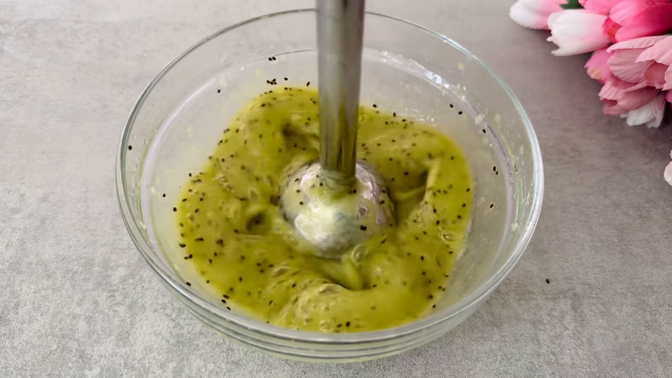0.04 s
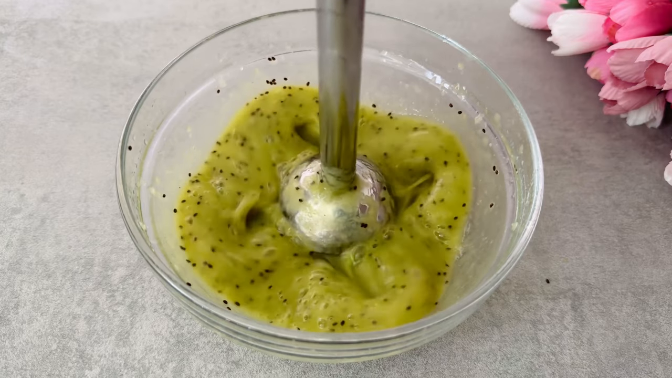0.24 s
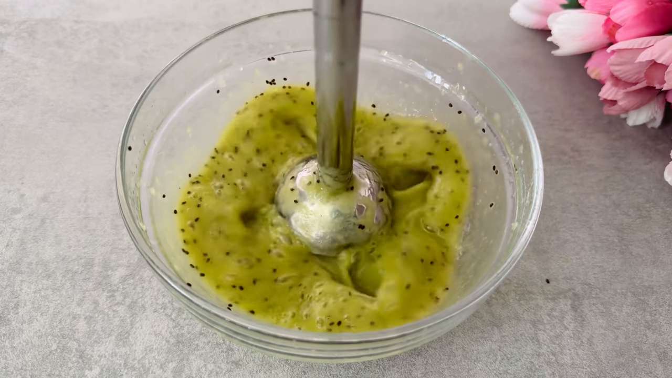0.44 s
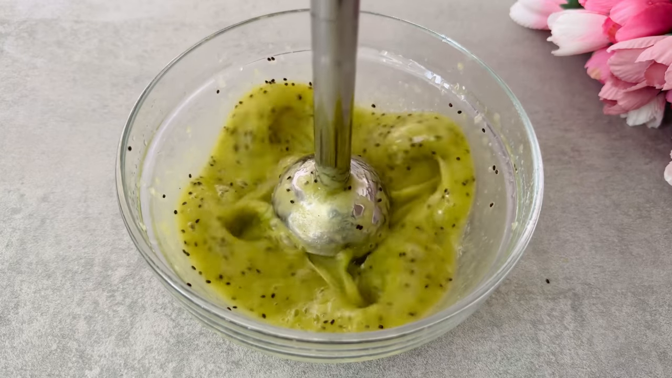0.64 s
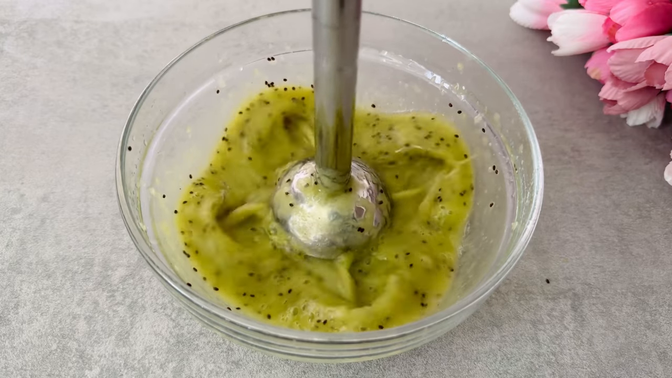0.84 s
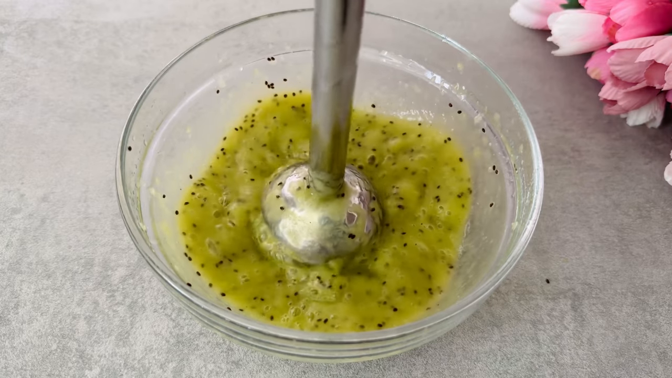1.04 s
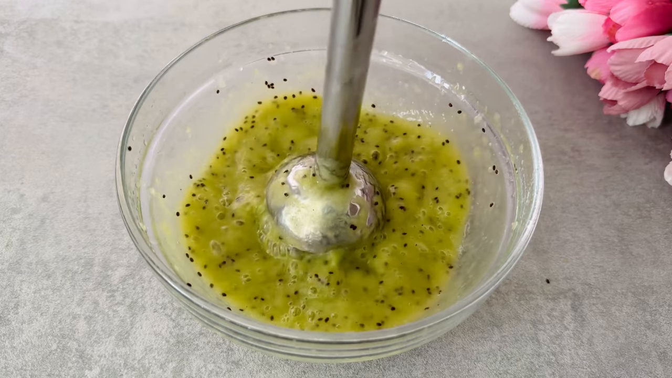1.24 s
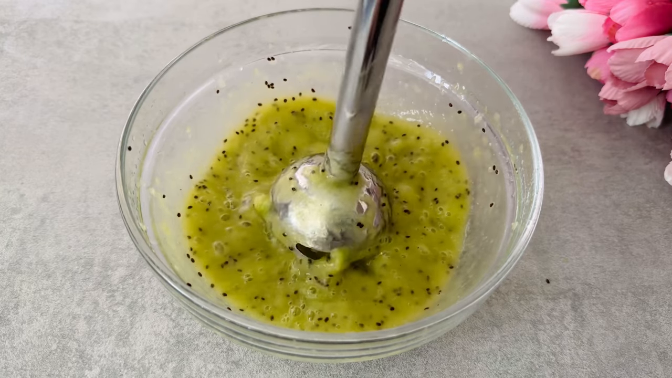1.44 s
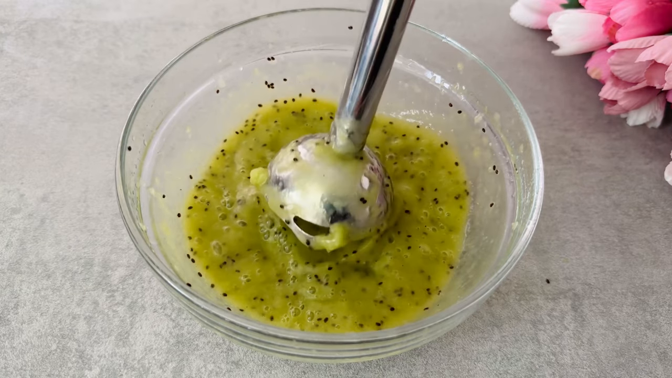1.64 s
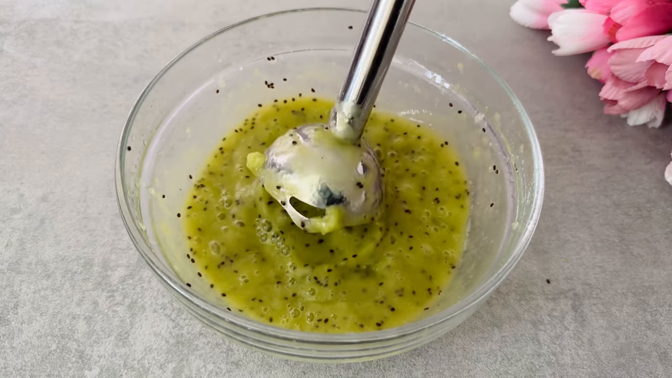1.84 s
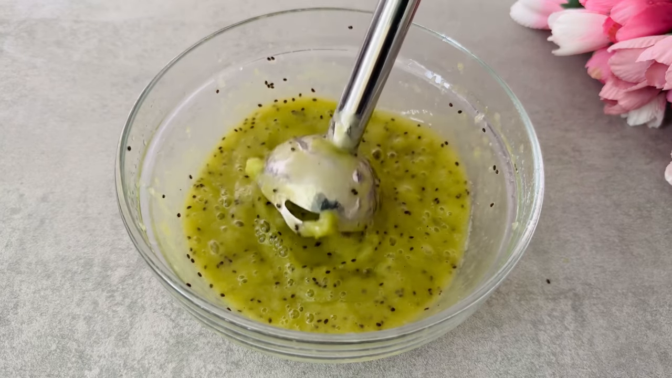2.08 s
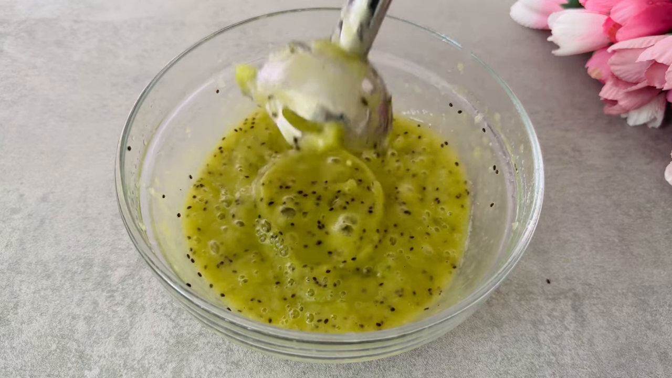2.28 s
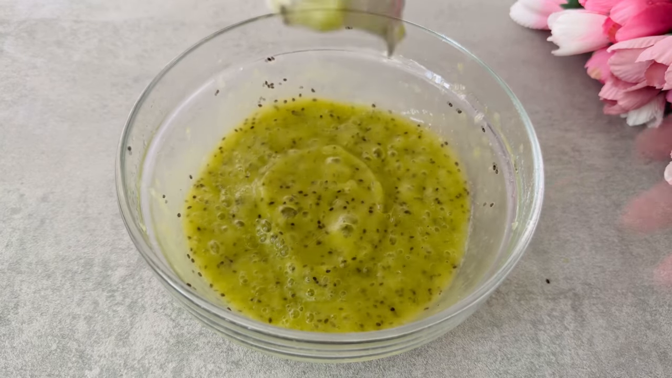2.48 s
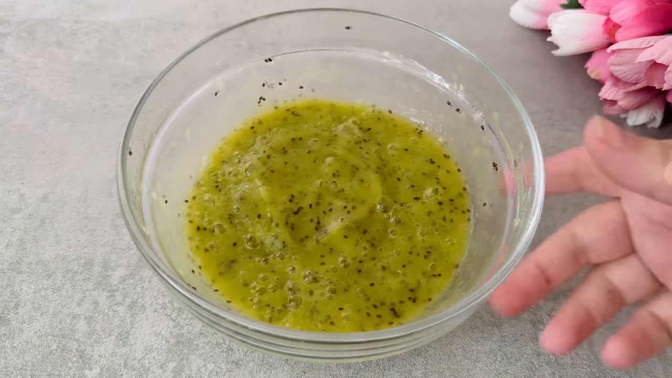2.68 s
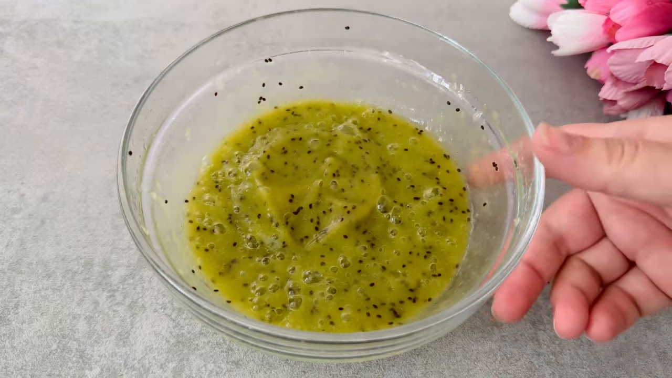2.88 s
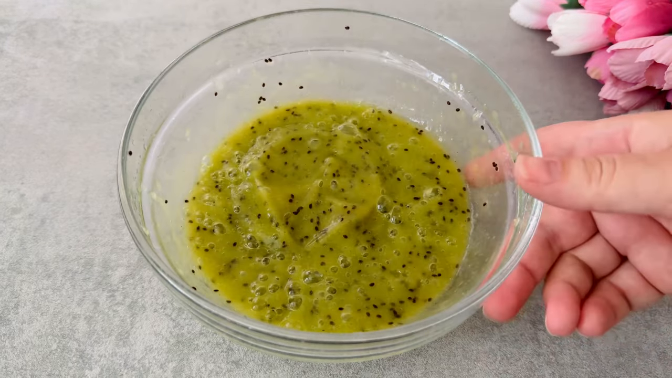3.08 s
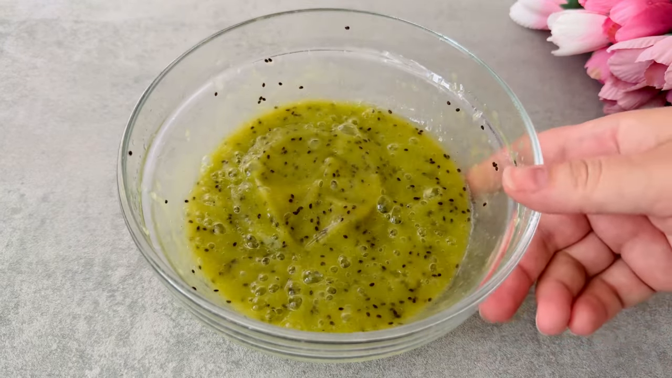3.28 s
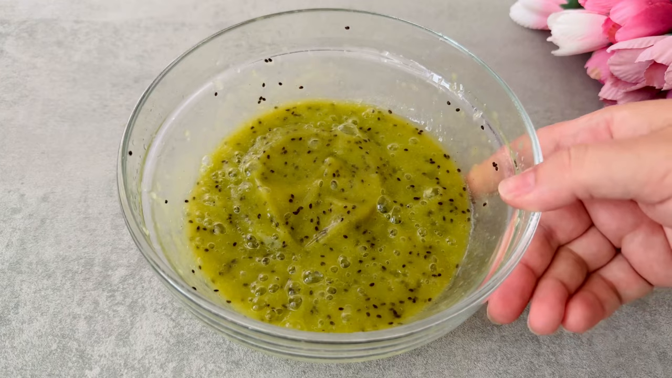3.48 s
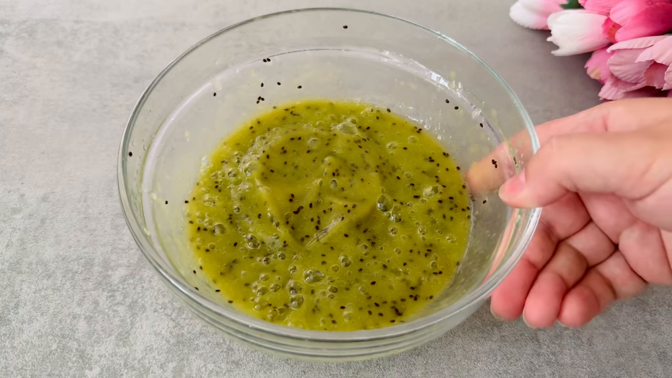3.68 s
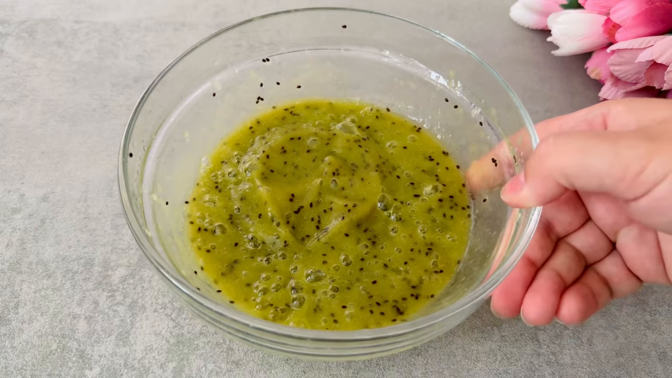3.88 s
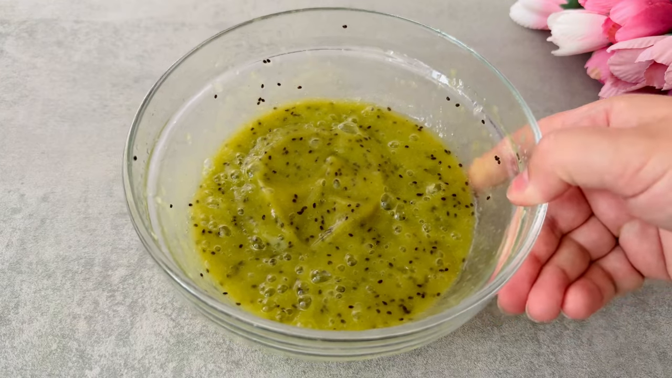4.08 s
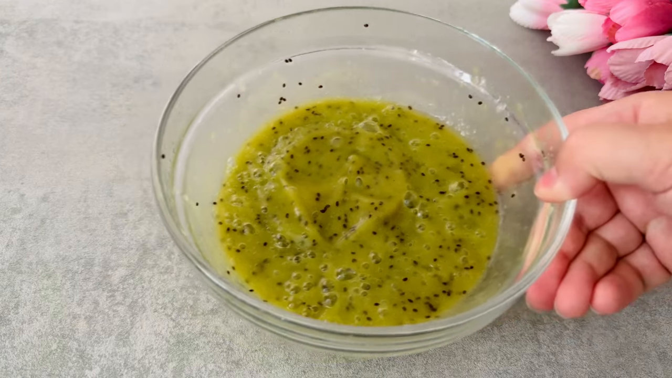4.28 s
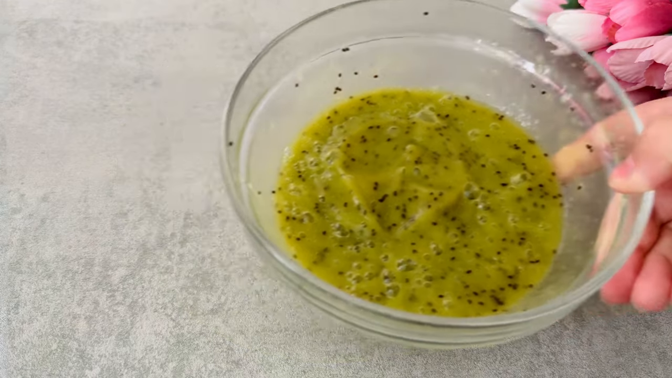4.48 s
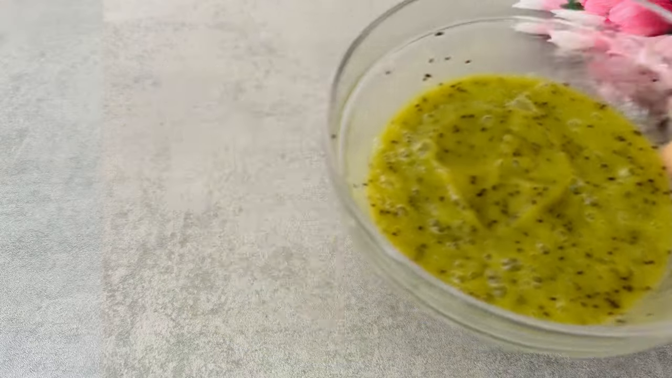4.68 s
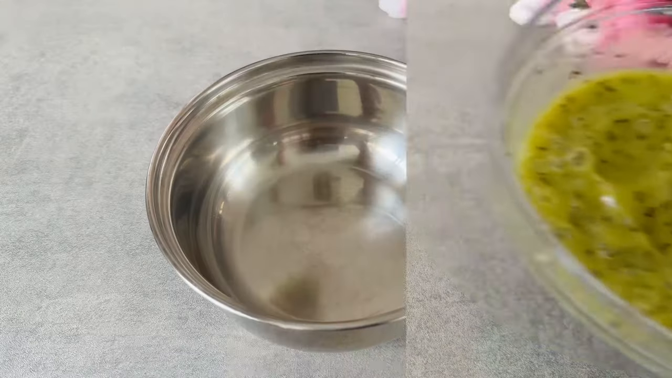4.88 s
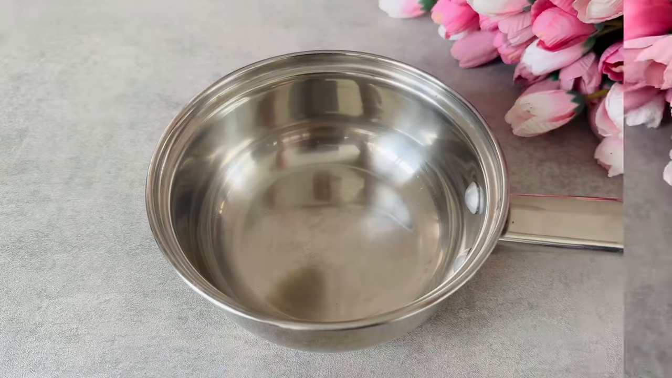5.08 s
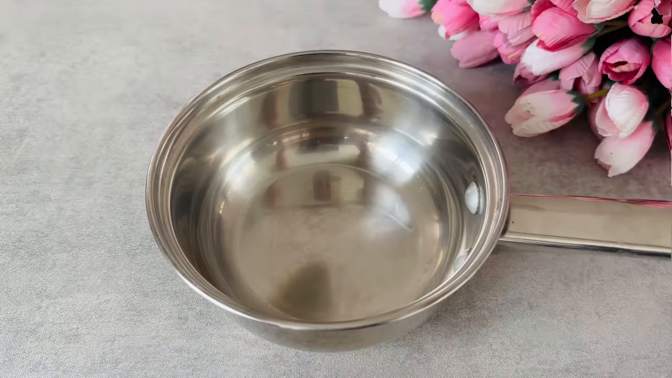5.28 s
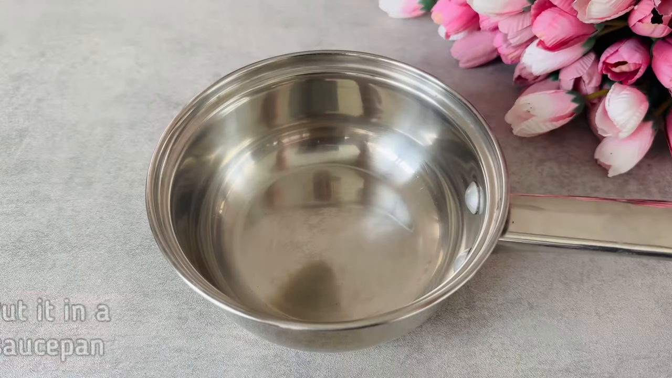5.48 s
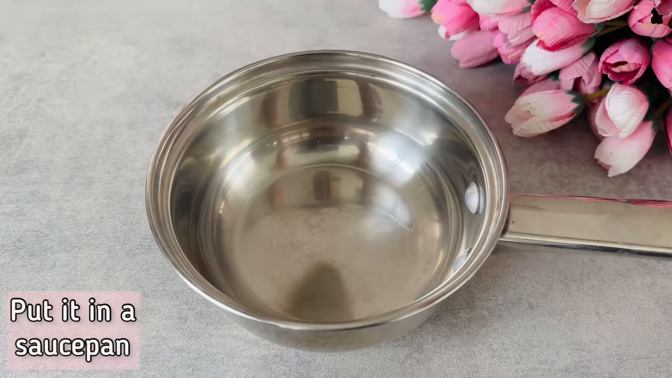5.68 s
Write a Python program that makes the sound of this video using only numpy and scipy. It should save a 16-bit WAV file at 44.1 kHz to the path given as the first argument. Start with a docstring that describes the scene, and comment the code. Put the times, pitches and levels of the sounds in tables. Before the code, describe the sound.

Begins mid-blend: a rough, wet, low buzz with bubbling glugs, sputters and small squeaks, heard near the microphone. The motor drops in pitch and dies around one second. Afterwards faint birds whistle and buzz outdoors with a yard echo, drops plop softly into puree, a brief bright rustle comes just before five seconds, and a low room hum rises at the end.

```python
"""In a kitchen, a hand blender churns fruit puree in a glass bowl, spits as it gulps air, then coasts to a stop.
The churn is shaped noise chopped once a turn; the whine is a stack of tones that follow the motor speed.
Drops plop back as short rising tones, and fingers brush the bowl as soft bursts of noise.
Songbirds outside are gliding tones with yard echoes. The quiet room is shaped noise, with a low hum that
is stronger near the end."""
import sys
import numpy as np
from scipy import signal
from scipy.fft import rfft, irfft, next_fast_len
from scipy.io import wavfile
from scipy.ndimage import uniform_filter1d, map_coordinates

SR = 44100
rng = np.random.default_rng(int(sys.argv[2]) if len(sys.argv) > 2 else 0)


def put_to_file(sound):
    """Save the sound as 16-bit audio at rate SR, in the file named by the first command-line argument."""
    columns = np.atleast_2d(sound).T  # one column per channel
    safe = np.clip(columns, -1, 1)
    whole_steps = np.round(safe * 32767)
    wavfile.write(sys.argv[1], SR, whole_steps.astype(np.int16))


N = 252693  # length of the scene (samples)
TOP_HZ = 15850  # nothing sounds above this frequency


def amp(db):
    """Turn decibels into a plain factor."""
    return 10 ** (np.asarray(db) / 20)


def unit(x):
    """Scale x to rms 1."""
    return x / np.sqrt(np.mean(x ** 2) + 1e-20)


def along(points, hz):
    """Read a curve of (frequency [Hz], value) points on a log frequency axis."""
    f, v = np.transpose(points)
    return np.interp(np.log(hz + 1), np.log(f + 1), v)


def curves(rows):
    """One value per sample for each column after the time."""
    s, *cols = np.transpose(rows)
    return [np.interp(np.arange(N) / SR, s, c) for c in cols]


def wobble(rate):
    """A smooth random curve, with rate knots a second."""
    knots = rng.standard_normal(int(N * rate / SR) + 4)
    return map_coordinates(knots, [np.arange(N) * rate / SR])


def filtered(x, response):
    """x times a response of frequency."""
    m = next_fast_len(N + SR // 2)
    return irfft(rfft(x, m) * response(np.fft.rfftfreq(m, 1 / SR)), m)[..., :N]


def coloured(x, spectrum):
    """x shaped by a spectrum, at rms 1."""
    return unit(filtered(x, lambda hz: amp(along(spectrum, hz))))


def noise():
    """Plain hiss, equally strong at all frequencies."""
    return rng.standard_normal(N)


def grains(rate):
    """Random impulses of random size, about rate a second, at rms 1."""
    return unit(noise() * (rng.random(N) < rate / SR))


def patches(shape, tall, wide):
    """A random field smoothed over frequency (tall) and time (wide), at rms 1."""
    field = uniform_filter1d(rng.standard_normal(shape), size=tall, axis=0)
    return unit(uniform_filter1d(field, size=wide, axis=1))


def humming_band(centre, rate):
    """A fuzzy tone: a wave of the given phase whose strength swings at random, at rms 1."""
    return unit(wobble(rate) * np.cos(centre) + wobble(rate) * np.sin(centre))


def add(track, s, sound):
    """Mix a sound in at s seconds."""
    part = track[max(round(s * SR), 0):][:len(sound)]
    part += sound[:len(part)]


# Tone colour of the kitchen air: (frequency [Hz], relative level per Hz [dB])
AIR_COLOUR = [(15, -21.5), (25, -2), (37, -9), (64, -16.5), (101, -20.5), (126, -28), (204, -26.5),
              (331, -28.5), (537, -24.5), (684, -25), (997, -25.5), (1750, -32), (2850, -28.5),
              (6210, -36.5), (9500, -53), (15500, -62)]
# Tone colour of the hum: (frequency [Hz], relative level per Hz [dB])
HUM_COLOUR = [(30, 4.5), (60, 0.5), (130, 1.5), (220, 2), (330, -0.5), (550, -3.5), (900, -8), (1600, -20),
              (4000, -18), (9000, -26), (15500, -27)]
# Loudness of the room: (time [s], air level [dB], hum level [dB])
ROOM_LEVELS = [(0, -89.5, -76), (1.5, -61.5, -78.5), (2.4, -63.5, -101), (3.2, -63, -94), (4.5, -63.5, -76),
               (5.2, -63, -63.5), (5.73, -63, -62.5)]
# Draught on the microphone: (time [s], level [dB])
DRAUGHT_LEVELS = [(0, -49.5), (1.8, -59.5), (1.9, -36.5), (2.2, -57), (2.7, -45), (3.2, -56), (4.2, -59),
                  (5.3, -54), (5.73, -51.5)]
# Stereo width of the air: (frequency [Hz], level of the left-right difference [dB])
AIR_WIDTH = [(60, -11.5), (200, -4.5), (600, 0.6), (7000, -1), (14000, -7)]
# Drone in the hum: centre (Hz), random swings per s, level over the rest of the hum (dB)
DRONE_HZ, DRONE_SWINGS, DRONE_DB = 552, 45, -8


def kitchen():
    """Still air, a slow draught on the microphone, and a faint low hum with a fuzzy drone, stronger near the end."""
    air_db, hum_db = curves(ROOM_LEVELS)
    mid, side = [amp(air_db + 0.28 * wobble(8.9)) * coloured(noise(), AIR_COLOUR) for part in range(2)]
    side = filtered(side, lambda hz: amp(along(AIR_WIDTH, hz)))  # long waves reach both sides alike
    drone = humming_band(2 * np.pi * DRONE_HZ * np.arange(N) / SR, DRONE_SWINGS)
    hum = amp(hum_db) * (coloured(noise(), HUM_COLOUR) + amp(DRONE_DB) * drone)
    # (frequency [Hz], relative level [dB])
    rumble = [(2, 0.0), (6, 2.0), (13, -9.5), (28, -54), (60, -46), (200, -75.0), (1000, -120)]
    draught = amp(curves(DRAUGHT_LEVELS)[0]) * coloured(noise(), rumble)
    return np.array([mid + side, mid - side]) + hum + draught


def note(length, start_hz, middle_hz, end_hz, warble_hz):
    """A whistle gliding through three pitches, with a fast warble."""
    t = np.arange(int(length * SR)) / SR
    u = t / length
    hz = np.polyval(np.polyfit([0, .5, 1], [start_hz, middle_hz, end_hz], 2), u)
    hz = hz + warble_hz * np.sin(2 * np.pi * 115 * t + rng.uniform(0, 2 * np.pi))
    return np.sin(2 * np.pi * np.cumsum(hz) / SR) * np.abs(np.sin(np.pi * u)) ** .5


def chatter(count):
    """Farther birds drop faint chirps at random, each swept up towards its end."""
    track = np.zeros(N)
    for when, pitch, glide, size in rng.random((count, 4)):
        hz = 2600 * 2 ** pitch
        level_db = -77 + 5 * size
        chirp = note(0.0353, hz * (1 + 0.122 * glide), hz, hz * 1.4, 32.4)
        add(track, when * N / SR, amp(level_db) * chirp)
    return track


# How long the yard echoes: (frequency [Hz], time to fall by 60 dB [s])
YARD_DECAY = [(2000, 0.18), (3100, 1.5), (4200, 1.57), (6000, 1.07), (8000, 0.82)]
# Nearby walls: scattered share of a note's straight sound (dB), time to fall by 60 dB (s)
SCATTER_DB, SCATTER_T60_S = -8, .06
ECHO_LUMPS_DB = 2.5  # separate walls make the long echo uneven


def yard(direct, sent):
    """Each side hears a note scattered by nearby walls, then a long, lumpy echo."""
    t = np.arange(SR // 10) / SR
    near = rng.standard_normal((2, len(t))) * amp(-60 * t / SCATTER_T60_S)
    near *= amp(SCATTER_DB) / np.linalg.norm(near[0])
    near[:, 0] += 1  # the straight path
    hz, t, z = signal.stft(rng.standard_normal((2, SR)), SR, nperseg=256)
    lumps = patches(z.shape[1:], tall=5, wide=8)
    echo_db = ECHO_LUMPS_DB * lumps - 60 * t / along(YARD_DECAY, hz)[:, None]
    far = signal.istft(z * amp(echo_db), SR, nperseg=256)[1]

    def heard(x, answer):
        """Every sample of x sets off the walls' answer."""
        return signal.fftconvolve(x[None], answer / np.linalg.norm(answer[0]), axes=1)[:, :N]

    return heard(direct, near) + heard(sent, far)


# Whistles, most of them falling: (time [s], length [s], start [Hz], middle [Hz], end [Hz],
# level [dB], echo over the direct sound [dB])
WHISTLE_NOTES = [(1.138, 0.045, 5430, 5390, 5150, -65, 2.5), (1.187, 0.04, 3410, 3340, 3240, -63, -4),
                 (1.334, 0.028, 4650, 4470, 4210, -74, 10), (1.367, 0.013, 4090, 3970, 3880, -44.5, -7),
                 (1.41, 0.069, 7400, 7220, 7030, -82, 11), (1.43, 0.034, 2650, 2480, 2600, -68, 5),
                 (1.462, 0.114, 2820, 2953, 2830, -67.5, 5.5), (1.767, .03, 2950, 2730, 2400, -77, -7),
                 (1.838, 0.025, 5410, 5350, 5270, -74.5, 16.5), (1.864, 0.021, 3600, 3460, 3380, -63.5, -6),
                 (2.216, 0.059, 4100, 3940, 3680, -67.5, 5), (2.138, 0.033, 8000, 7700, 7400, -61, 12),
                 (2.287, 0.056, 7820, 7500, 6890, -61.5, 10), (2.437, 0.028, 8000, 7810, 7750, -58.5, 6.5),
                 (2.476, 0.026, 6600, 5180, 4280, -59, 13), (2.504, 0.089, 4320, 4334, 4520, -62, 8),
                 (2.598, 0.027, 4090, 3930, 3930, -59, 10), (2.62, 0.025, 3910, 3790, 3140, -52, 4.5),
                 (2.694, 0.039, 3590, 3300, 3170, -54, -3), (2.75, 0.1, 3210, 3130, 3114, -62.5, 6),
                 (2.936, 0.025, 5730, 5350, 5060, -63, -4), (2.957, 0.021, 5250, 5270, 4920, -63, 2),
                 (3.307, 0.068, 4100, 3880, 3660, -67, 6.5), (3.639, 0.073, 6150, 6120, 6080, -75, 1),
                 (3.674, .016, 5430, 4670, 4500, -68, -10), (3.692, 0.028, 4490, 4490, 4480, -62.5, -1),
                 (3.851, 0.067, 2900, 3250, 3260, -70, -3), (3.933, 0.055, 7850, 7640, 7400, -80, 9),
                 (4.059, 0.048, 5300, 5250, 4940, -73, -11), (4.162, .016, 4680, 4670, 4420, -64, -9),
                 (4.168, 0.054, 2900, 2807, 2640, -60, -4), (4.205, .016, 4020, 3900, 3740, -65, -1),
                 (4.327, 0.086, 3600, 3360, 3150, -73, 3), (4.427, 0.016, 3400, 5000, 6700, -64, 4),
                 (4.446, 0.02, 6520, 4780, 3700, -62.5, 3), (4.475, 0.023, 7110, 6950, 6240, -56, 5),
                 (4.586, 0.051, 7350, 6750, 5300, -53.5, 5), (4.768, 0.03, 7170, 6750, 5400, -52.5, 6.5),
                 (5.043, 0.014, 3870, 3770, 3760, -59.5, -4), (5.093, 0.019, 4490, 5300, 6250, -56.5, 11),
                 (5.107, 0.025, 6150, 6080, 5850, -51, 6.5), (5.145, 0.017, 5860, 5180, 4200, -45, 0.5),
                 (5.162, 0.013, 4500, 4050, 3750, -54, 1)]
# Buzzes: (time [s], length [s], centre [Hz], warble depth [Hz], level [dB])
BUZZ_NOTES = [(1.236, 0.045, 3930, 130, -53.5), (1.252, 0.051, 4420, 200, -62.5),
              (2.003, 0.06, 7500, 337, -62.5), (4.426, 0.0566, 7050, 463, -64.5),
              (4.861, 0.12, 7950, 400, -58)]
# Pips of the closing trill, mostly high and low in turn: (time [s], pitch [Hz], level [dB])
TRILL_PIPS = [(5.229, 3360, -66), (5.28, 3920, -56.5), (5.326, 5760, -50.5), (5.335, 3570, -60),
              (5.386, 5050, -52.5), (5.397, 3790, -57.5), (5.454, 4980, -50), (5.466, 3720, -58),
              (5.512, 5360, -56), (5.523, 3870, -55.5), (5.573, 4770, -52), (5.587, 3700, -57),
              (5.645, 4520, -54), (5.662, 3680, -56)]
WHISTLE_WARBLE_HZ = 35  # warble depth
BUZZ_GLIDE = 0.6  # a buzz rises by this share of its warble depth to either side of its centre
PIP_S = 0.014  # length of a pip
BUZZ_ECHO_DB, TRILL_ECHO_DB = 8, -2  # yard echo over the direct sound


def bird():
    """Distant songbirds: whistles each with their own share of yard echo, buzzes and trill with a shared one."""
    notes = []
    for s, length, start_hz, middle_hz, end_hz, db, echo_db in WHISTLE_NOTES:
        whistle = note(length, start_hz, middle_hz, end_hz, WHISTLE_WARBLE_HZ)
        notes.append((s, amp(db) * whistle, echo_db))
    for s, length, hz, warble_hz, db in BUZZ_NOTES:
        glide_hz = BUZZ_GLIDE * warble_hz
        buzz = note(length, hz - glide_hz, hz, hz + glide_hz, warble_hz)
        notes.append((s, amp(db) * buzz, BUZZ_ECHO_DB))
    for s, hz, db in TRILL_PIPS:
        pip = note(PIP_S, hz * 1.02, hz, hz * .98, 60)
        notes.append((s, amp(db) * pip, TRILL_ECHO_DB))
    direct = chatter(count=34)
    sent = amp(9.5) * direct  # what feeds the long echo
    for s, sound, echo_db in notes:
        add(direct, s, sound)
        add(sent, s, amp(echo_db) * sound)
    return yard(direct, sent)


# Drops and bubbles in the puree: (time [s], starting pitch [Hz], level before swell and decay [dB])
PLOP_DROPS = [(2.089, 408, -52.5), (2.54, 627, -56.5), (3.59, 515, -58), (3.64, 542, -54.5),
              (4.708, 1077, -53), (4.882, 2070, -59)]
# Light contacts with the bowl: (time [s], relative level [dB])
BOWL_TICKS = [(1.879, -79), (3.5214, -59), (4.203, -61.5), (4.228, -63), (5.702, -54)]
# Faint high hiss, then a bright rustle with a bump: (time [s], level [dB])
RUSTLE_LEVELS = [(2.6, -100), (3.05, -80.5), (4.2, -79.5), (4.69, -85.5), (4.735, -69), (4.752, -58.5),
                 (4.775, -70), (4.815, -64), (4.86, -72.5), (4.98, -82.5), (5.07, -91.5)]
# Tone colour of the hiss and rustle: (frequency [Hz], relative level [dB])
RUSTLE_COLOUR = [(200, -10), (1000, 4.5), (4000, 8), (9000, 1.5), (15000, -2.5)]


def bowl():
    """Drops ring briefly with a rising pitch; light touches tick on the bowl; a faint hiss, then a rustle."""
    t = np.arange(SR // 8) / SR
    plops, touch = np.zeros(N), np.zeros(N)
    for s, hz, db in PLOP_DROPS:
        swell = amp(db + 1.0 - 60 * t / 0.088) * (1 - np.exp(-t / 0.0053))
        add(plops, s, swell * np.sin(2 * np.pi * hz * t * (1 + 1.5 * t)))
    for s, db in BOWL_TICKS:
        add(touch, s - .008, amp(db - 3 - 60 * t / .11) * (1 - np.exp(-t / .008)))  # a soft start
    rustle = amp(curves(RUSTLE_LEVELS)[0]) * coloured(noise() + .5 * grains(900), RUSTLE_COLOUR)
    # (frequency [Hz], relative level [dB])
    tick_colour = [(200, -7), (1000, -11), (4000, 11), (14000, -7.0)]
    return plops + rustle + touch * coloured(noise(), tick_colour)


# Running speed (turns per s), switch-off (s), coasting time constant (s), dry friction (as turns per s)
RUN_SPEED, OFF_S, COAST_S, FRICTION = 150.5, .75, .36, 15


def shaft_speed():
    """Steady until switched off, then slowed by drag and dry friction."""
    coasting = np.maximum(np.arange(N) / SR - OFF_S, 0)
    return np.maximum((RUN_SPEED + FRICTION) * np.exp(-coasting / COAST_S) - FRICTION, 1e-3)


# Motor housing: (frequency [Hz], level of one whine tone before WHINE_DB is added [dB])
HOUSING_LEVELS = [(1500, -77), (3500, -72), (4800, -73), (6200, -71), (7400, -68), (9000, -69),
                  (10200, -76), (11000, -77), (12000, -76), (13200, -71), (14500, -73), (15500, -78)]
# The brushes fall quiet below this speed (turns per s), this steeply
WHINE_FADE_SPEED, WHINE_FADE_POWER = 94, 6
WHINE_DB, WHINE_BLUR = 2, .7  # added level; phase jitter (radians)


def whine(angle, speed, count):
    """Brushes tick over count motor contacts a turn; the tones sink through the housing's resonances."""
    tone = np.zeros(N)
    for k in range(1, 21):
        hz = k * count * speed
        level = amp(along(HOUSING_LEVELS, hz) + 4.6 * wobble(71.4))
        wave = np.sin(k * count * angle + WHINE_BLUR * wobble(400))
        tone += level * wave * (hz < TOP_HZ)
    return amp(WHINE_DB) * tone / (1 + (WHINE_FADE_SPEED / speed) ** WHINE_FADE_POWER)


# The blade gulps air: (time [s], relative level of the hiss [dB], relative level of the thump [dB])
AIR_GULPS = [(0.012, -25, -38.5), (.032, -23.5, -31), (0.1156, -24.5, -21.5), (0.1294, -22, -28),
             (0.207, -23, -38), (0.2268, -21, -17), (.268, -18.5, -17), (0.3902, -24.5, -22),
             (0.411, -29, -25), (0.4372, -16.5, -32), (.455, -21.5, -35), (.4645, -30.5, -32),
             (0.476, -16.5, -20), (0.484, -22.5, -22.5), (0.501, -22.5, -17.5), (0.5227, -17, -34),
             (0.556, -27, -23), (.576, -26, -28), (0.613, -19, -32), (0.6785, -22.5, -37.5),
             (.686, -28, -34), (.696, -22, -29), (.753, -38.5, -27.5), (.772, -34.5, -28),
             (0.792, -26.5, -30), (.831, -39, -26.5), (.857, -38.5, -26.5)]
# A bubble squirts out with a squeak: (time [s], pitch [Hz], level [dB])
SQUEAKS = [(.412, 6200, -26), (.4362, 3330, -37), (.5222, 6270, -33), (.611, 5970, -29),
           (.696, 4310, -32.5)]
SPIT_S, SPIT_LEAD_S = 0.0032, 0.0018  # swell time of a gulp, its head start


def gulps():
    """Each gulp of air swells and collapses: shapes for its hiss and thump, and squeaks of bubbles."""
    u = np.arange(SR // 10) / SR / SPIT_S
    burst = (u * np.exp(1 - u)) ** 2
    spit, thump, squirt = np.zeros((3, N))
    for s, db, thump_db in AIR_GULPS:
        add(spit, s - SPIT_LEAD_S, amp(db) * burst)
        add(thump, s - SPIT_LEAD_S, amp(thump_db) * burst)
    for s, hz, db in SQUEAKS:
        phase = np.cumsum(2 * np.pi * hz / SR + 0.323 * rng.standard_normal(len(u)))  # a rough pitch
        add(squirt, s - SPIT_LEAD_S, amp(db) * burst * np.sin(phase))
    return spit, thump, squirt


# The air pocket under the guard collapses: (time [s], length [s], middle pitch [Hz], level [dB])
POCKET_GLUGS = [(.008, 0.015, 795, -35), (0.068, 0.048, 736, -28), (0.16, 0.011, 687, -20.5),
                (0.172, 0.03, 684, -26), (0.205, 0.0093, 696, -22), (0.261, 0.019, 786, -20.5),
                (0.284, 0.013, 734, -21.5), (0.294, 0.028, 750, -24), (.342, 0.024, 812, -22.5),
                (0.384, 0.017, 724, -21.5), (0.443, 0.019, 694, -26), (0.463, 0.021, 997, -24.5),
                (0.509, 0.035, 714, -25.5), (0.574, 0.014, 770, -21.5), (0.605, 0.02, 800, -21),
                (.648, 0.01, 758, -25), (.673, 0.015, 764, -24), (0.723, 0.024, 780, -28),
                (0.764, 0.015, 733, -24.5), (0.797, 0.014, 1060, -28.5), (0.825, 0.021, 706, -31),
                (0.856, 0.0085, 740, -33), (0.882, 0.027, 733, -35.5)]
GLUG_RISE, GLUG_BLUR = 0.1, 0.29  # share by which the pitch climbs; phase jitter (radians)


def glugs():
    """Each collapse of the air pocket rings for a few cycles, rising unevenly in pitch."""
    track, jitter = np.zeros(N), GLUG_BLUR * wobble(300)
    for s, length, hz, db in POCKET_GLUGS:
        u = np.linspace(0, 1, int(length * SR))
        turns = np.cumsum(hz * (1 + GLUG_RISE * (u - .5))) / SR + rng.random()
        phase = 2 * np.pi * turns + jitter[int(s * SR):][:len(u)]
        add(track, s, amp(db) * np.sin(np.pi * u) ** 2 * np.sin(phase))
    return track


def fizz(patchy_db):
    """Bursting bubbles: brief patches of hiss, each at its own pitch."""
    z = signal.stft(noise(), nperseg=128)[2]
    patchy = amp(patchy_db * patches(z.shape, tall=6, wide=3))
    return unit(signal.istft(z * patchy, nperseg=128)[1][:N])


# How the stick and the bowl ring: (centre [Hz], width [Hz], relative level [dB])
RING_MODES = [(89.7, 8.7, -5), (231.4, 11, 2.5), (243, 8.1, 1.5), (297, 23, -9.5), (592.4, 13, 3.5),
              (678, 20.5, 0), (804, 81, 1), (992, 32, 3.5), (1055, 16, 2), (1538, 33, -3.5)]


def ringing(x):
    """x through the narrow resonances of stick and bowl."""
    def response(f):
        """Sum of the resonances, with alternating signs."""
        total = 0
        for k, (centre, width, db) in enumerate(RING_MODES):
            spread = 1j * f * width
            total = total + (-1) ** k * amp(db) * spread / (centre * centre - f * f + spread)
        return total

    return filtered(x, response)


def walls(x, t60, wet_db):
    """Bowl, worktop and room answer with a short tail that falls by 60 dB in t60 seconds."""
    t = np.arange(SR // 3) / SR
    tail = rng.standard_normal(len(t)) * amp(-60 * t / t60) * (t > .002)
    return x + amp(wet_db) * signal.fftconvolve(x, tail / np.linalg.norm(tail))[:N]


# Air pocket under the blade guard: (time [s], resonance [Hz])
POCKET_PITCH = [(0, 740), (.17, 689.6), (.3, 771.5), (.4, 796), (.52, 759), (.7, 790)]
# Tone colours of churn, slosh and spray: (frequency [Hz], relative level [dB])
CHURN_COLOUR = [(400, -42), (520, -8.5), (680, -1), (860, -5.5), (1040, -5), (1250, -9.5), (1530, -9),
                (1800, -15.5), (1950, -15), (2200, -25), (3000, -55)]
SLOSH_COLOUR = [(45, -43.5), (62, -22), (90, -6.5), (125, -14), (185, -14.5), (240, 0.5), (320, 0.5),
                (420, -3), (540, -8.5), (800, -54)]
SPRAY_COLOUR = [(1200, -6), (2000, -9.5), (2450, 7), (2900, -4), (3300, 6), (3650, 1), (4900, 2), (6800, 1),
                (8700, -4), (9800, -6), (11000, -7), (12000, -9.5), (14700, -11), (15800, -21.5)]
# How hard the blade bites into the puree: (time [s], level before the grip fades [dB])
BITE_LEVELS = [(0, -28.5), (.11, -30), (.29, -30), (.375, -31.5), (.475, -26), (.51, -28.5), (.585, -27.5),
               (.6, -32), (.62, -31), (.655, -33), (.69, -28), (.725, -34), (.772, -32), (.787, -32.5),
               (.835, -29.5), (.875, -32), (.905, -30.5), (.925, -34), (.96, -30.5)]
# The stick shakes once a turn, hardest as the motor coasts through its resonance:
# (speed [turns per s], level [dB])
SHAKE_LEVELS = [(60, -78), (76, -73), (90, -53.5), (110, -48), (135, -53.5), (150, -58)]
# Below this speed (turns per s) the blade loses its grip on the puree, this steeply
STALL_SPEED, STALL_POWER = 107.8, 4.98
SLOSH_DB, SPRAY_DB, RING_DB = -6, -11.5, -6.5  # levels in the mix
KITCHEN_T60_S, KITCHEN_WET_DB = 0.45, -16.5  # the room's answer to the churn


def blender():
    """The blade chops puree: churn, air pocket, slosh, spray and whine follow load and motor speed."""
    speed = shaft_speed() * (1 + 0.0016 * wobble(24.2))
    pace = speed / speed.max()
    angle = 2 * np.pi * np.cumsum(speed) / SR
    effort = amp(curves(BITE_LEVELS)[0]) / (1 + (STALL_SPEED / speed) ** STALL_POWER)
    chop = amp((1.75 * np.cos(angle) + 1.5 * wobble(109.5)) * pace)  # one cut a turn, through uneven lumps
    spit, thump, squirt = gulps()

    pocket = humming_band(2 * np.pi * np.cumsum(curves(POCKET_PITCH)[0]) / SR, 109.5)
    blade = np.zeros(N)
    for k in range(1, 14):  # multiples of the turning rate
        blade += np.cos(k * angle + rng.uniform(0, 2 * np.pi)) * (1 + .5 * wobble(15))
    churn = amp(-1.5) * coloured(grains(3000) * chop, CHURN_COLOUR) + amp(-7.0) * pocket
    churn += amp(-16.0) * filtered(blade, lambda hz: amp(along(CHURN_COLOUR, hz)))
    slosh = amp(SLOSH_DB) * coloured(grains(1600) * chop, SLOSH_COLOUR)

    ring = unit(ringing(effort * grains(2500) * chop))  # rings on after the blade lets go
    ring *= amp(RING_DB) * np.sqrt(np.mean(effort ** 2))
    shake = amp(along(SHAKE_LEVELS, speed)) * np.sin(angle)
    thuds = amp(-9.0) * thump * coloured(noise(), CHURN_COLOUR)
    body = effort * (churn + slosh) + ring + thuds + glugs()

    spray = amp(SPRAY_DB) * effort * pace ** 0.51 * chop * coloured(fizz(patchy_db=4.5), SPRAY_COLOUR)
    spit_hiss = coloured(fizz(patchy_db=5.0) + 0.5 * grains(2000), SPRAY_COLOUR)
    spray += amp(-11.0) * spit * spit_hiss + squirt
    bright = walls(spray + whine(angle, speed, count=16), t60=0.2, wet_db=-10.0)
    return shake + walls(body, KITCHEN_T60_S, KITCHEN_WET_DB) + bright


def scene():
    """Everything heard together, from the quiet room to the blender."""
    return kitchen() + bird() + bowl() + blender()


def record(dry):
    """The recorder keeps nothing above its band limit."""
    return filtered(dry, lambda hz: hz < TOP_HZ)


dry = scene()
out = record(dry)
put_to_file(out)
```